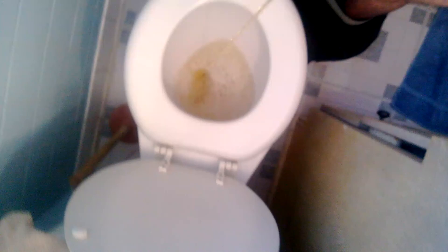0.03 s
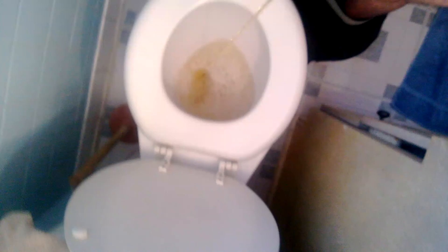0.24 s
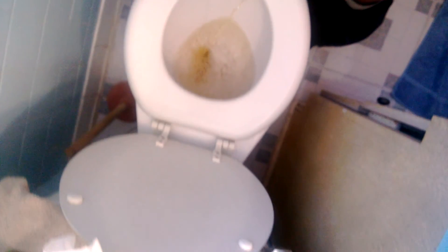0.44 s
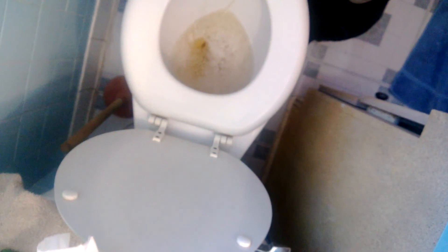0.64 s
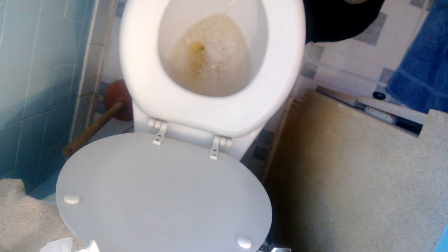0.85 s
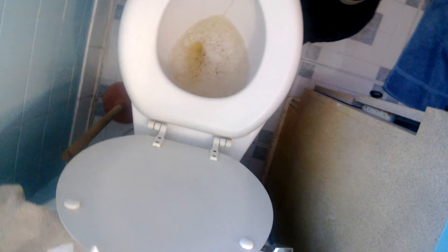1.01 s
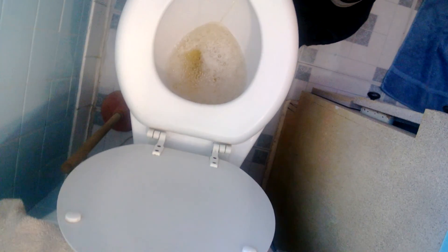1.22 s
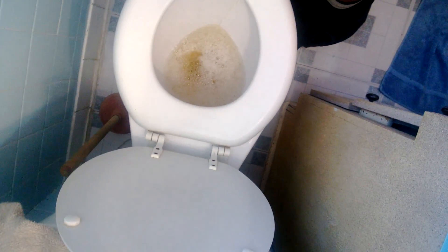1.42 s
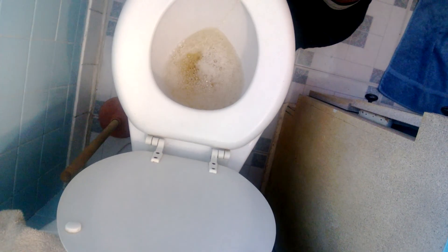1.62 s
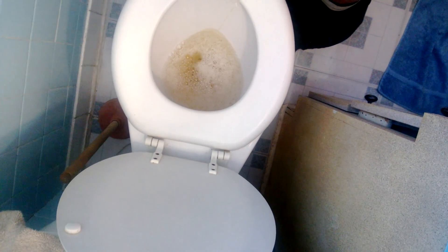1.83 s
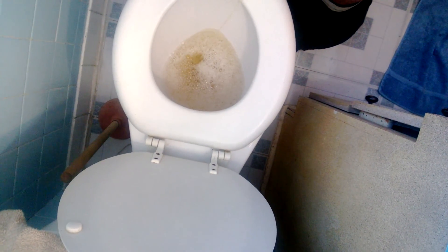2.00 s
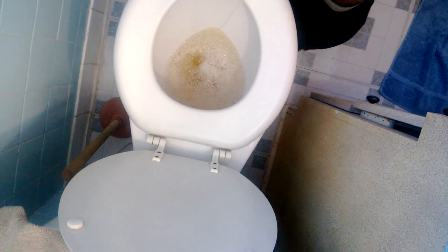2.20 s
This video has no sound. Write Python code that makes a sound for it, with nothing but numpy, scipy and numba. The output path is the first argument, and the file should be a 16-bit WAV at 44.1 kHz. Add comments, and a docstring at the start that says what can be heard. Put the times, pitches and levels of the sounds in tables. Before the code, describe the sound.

Someone pees into a toilet bowl, heard from nearby in a small bathroom. The stream bubbles and gurgles strongly at first, then weakens and breaks into separate splats and drips, with tiny bubbles ticking throughout.

```python
"""A stream of urine falls into the water of a toilet bowl in a small tiled bathroom. While strong, it drives
big gurgling bubbles under the surface; then it thins and breaks into splats. Sharp ticks ring out and tiny
bubbles fizz throughout. Each bubble is a damped sine rising in pitch. The water sounds ring in the bowl and
briefly in the room, over a faint hum."""
import sys
import numpy as np
from scipy import signal
from scipy.fft import rfft, irfft
from scipy.io import wavfile
from scipy.ndimage import uniform_filter1d
from numba import njit

SR = 44100
rng = np.random.default_rng(int(sys.argv[2]) if len(sys.argv) > 2 else 0)


def materialize(psi):
    """Save the field psi as 16-bit PCM at rate SR to the path in sys.argv[1].

    A 1-D psi becomes a single channel; in a 2-D psi each row is a channel.
    """
    bounded = np.clip(np.atleast_2d(psi).T, -1, 1)
    quanta = np.round(bounded * 32767).astype(np.int16)
    wavfile.write(sys.argv[1], SR, quanta)


N = 103635

# deep gurgle (time [s], relative level [dB])
GURGLE_LEVEL = [(0.1, -43.5), (0.12, -46.5), (0.22, -45.5), (0.26, -35), (0.31, -41.5), (0.42, -38.5),
                (0.44, -44), (0.57, -41), (0.65, -39.5), (0.74, -39), (0.76, -38.5), (0.92, -52.5),
                (0.96, -40), (1.0, -52), (1.03, -42), (1.22, -45.5), (1.25, -51), (1.83, -75), (1.85, -55),
                (2.02, -52), (2.11, -74), (2.26, -49.5), (2.32, -53), (2.35, -54)]
# big bubbles, shrinking as the stream weakens (time [s], pitch [Hz])
GURGLE_HZ = [(.1, 363.5), (.65, 397), (1.2, 448.4), (1.45, 580), (1.9, 604), (2.3, 478)]
# single big bubbles (time [s], pitch [Hz], relative level [dB])
GULP_EVENTS = [(.093, 351.5, -34.5), (0.117, 351, -33), (.17, 377, -34.5), (.247, 355, -32),
               (.405, 392, -33), (.503, 398, -36), (.583, 704, -36), (.612, 407, -28.5),
               (0.6503, 383, -23.5), (.703, 690, -37.5), (1.03, 650, -38), (1.066, 650, -36.5),
               (1.076, 446, -38), (1.125, 676, -33.5), (1.16, 706, -34.5), (1.207, 499, -37),
               (1.322, 512, -45.5), (1.347, 720, -38), (1.415, 730, -34.5), (1.563, 662, -45.5),
               (1.594, 685, -41.5), (1.856, 670, -35.5), (1.925, 720, -39.5), (2.285, 479, -36.5)]
# splashing (time [s], relative level [dB])
SPLASH_LEVEL = [(.1, -53.5), (.22, -49), (.34, -44.5), (.39, -42), (.5, -49.5), (.62, -51), (.7, -43),
                (.74, -46.5), (.82, -46), (.93, -50.5), (1.03, -46), (1.2, -52), (1.34, -49), (1.43, -56),
                (1.48, -51.5), (1.52, -56), (1.58, -54.5), (1.65, -59), (1.76, -60.5), (1.84, -55),
                (1.93, -58.5), (2.01, -54), (2.05, -57.5), (2.15, -59), (2.21, -53), (2.27, -55.5),
                (2.35, -73)]
# splash colour (frequency [Hz], gain [dB])
SPLASH_EQ = [(250, -22), (500, -22), (720, 2.5), (950, -9.5), (1250, -1.5), (2000, -2.5), (2800, 2.5),
             (4500, -22), (12000, -24)]
# fine spray, faltering once the stream thins (time [s], relative level [dB])
SPRAY_LEVEL = [(.1, -53), (.15, -54.5), (.26, -50.5), (.36, -48.5), (.5, -50.5), (.59, -53.5), (.7, -46.5),
               (.745, -56), (.8, -47), (.9, -54.5), (.98, -56), (1.07, -54), (1.095, -66), (1.125, -52.5),
               (1.2, -63.5), (1.225, -80), (1.28, -55.5), (1.36, -56), (1.41, -66.5), (1.46, -75.5),
               (1.5, -65), (1.57, -60), (1.67, -62.5), (1.76, -64), (1.88, -55.5), (1.935, -63), (2.0, -62),
               (2.035, -61), (2.09, -50.5), (2.16, -65.5), (2.22, -56.5), (2.28, -70), (2.325, -52.5),
               (2.35, -70)]
# spray colour (frequency [Hz], gain [dB])
SPRAY_EQ = [(1500, -9), (2200, -12), (3200, -5), (4200, -4), (5500, -1.5), (6500, 4), (7500, -2),
            (10500, -1.5), (13000, -6.5), (15500, -8)]
# low room noise (frequency [Hz], gain [dB])
RUMBLE_EQ = [(20, 3), (45, -7), (75, -1), (105, -7.5), (150, -5.5), (250, -12), (1000, -20), (15000, -44)]
# droplets spattering the bowl (time [s], relative level [dB], centre [Hz], decay [s])
SPURT_EVENTS = [(.25, -49, 10200, .012), (.283, -39.5, 9500, .008), (.441, -34, 5460, .004),
                (.614, -40.5, 5140, .006), (0.685, -37, 8700, 0.0064), (.701, -42.5, 10100, 0.02),
                (0.781, -33, 6760, 0.0033), (1.126, -47, 8600, 0.013), (1.177, -44, 7600, 0.013),
                (1.256, -46, 6100, 0.0039), (1.271, -44.5, 9600, .006), (1.324, -52.5, 11100, .02),
                (1.489, -49, 7100, 0.0055), (1.621, -53, 10200, 0.012), (1.655, -47.5, 7700, 0.0096),
                (1.741, -49.5, 6100, .006), (1.781, -44, 7400, 0.0038), (1.795, -52, 9000, 0.0097),
                (1.82, -45.5, 8200, 0.011), (1.855, -41.5, 7100, 0.005), (1.963, -44, 6900, .003),
                (1.981, -39, 7100, 0.0033), (1.99, -48.5, 6460, 0.0096), (2.057, -48.5, 7400, 0.013),
                (2.088, -44.5, 6200, .008), (2.176, -52, 8700, 0.0092), (2.326, -47, 9400, .009)]
# sharp ticks of drops (time [s], relative level [dB], pitch [Hz])
TICK_EVENTS = [(0.264, -48, 6400), (0.2842, -24.5, 6480), (0.3293, -30, 6300), (0.3708, -27, 6300),
               (0.4416, -31.5, 4900), (0.615, -31.5, 5200), (0.6315, -29.5, 6260), (0.6853, -41, 6400),
               (0.759, -33.5, 6300), (0.782, -21, 3110), (.89, -35, 6400), (0.9955, -25.5, 6340),
               (1.271, -27, 10000), (1.8214, -33.5, 4420), (1.822, -36.5, 1950), (1.8563, -33, 2840),
               (1.9894, -33.5, 3520), (2.3035, -36.5, 3340)]
# slugs of liquid slapping the water (time [s], relative level [dB], centre [Hz])
SPLAT_EVENTS = [(0.366, -33.5, 2160), (.408, -40, 1420), (.68, -36, 1690), (0.782, -33, 1800),
                (.783, -48, 3430), (1.004, -35, 1296), (1.126, -40, 1290), (1.21, -38, 1270),
                (1.256, -40.5, 1670), (1.386, -38.5, 1530), (1.398, -47, 3430), (1.412, -35, 1190),
                (1.427, -42, 1266), (1.546, -41, 1620), (1.632, -43.5, 1273), (1.667, -47.5, 1590),
                (1.723, -40.5, 1140), (1.723, -46, 3030), (1.781, -45, 1095), (1.821, -35.5, 3650),
                (1.855, -40.5, 1590), (1.995, -42, 1174), (2.059, -33, 1820), (2.088, -38.5, 1710),
                (2.134, -41.5, 1860), (2.17, -38, 1293), (2.174, -40, 2080)]
# bowl and wall resonances (frequency [Hz], T60 [s], gain over direct sound [dB])
BOWL_WALL_MODES = [(293.4, 1, 10.5), (322.4, 0.35, 12.5), (387, 0.14, 2.5), (447.1, 0.27, 6.5),
                   (567, 0.029, -0.5), (684.5, 0.2, 1.5), (763, 0.29, 0.5), (1167, 0.41, 7.5),
                   (1243.4, 0.11, 18.5), (1537, 0.31, 8), (1632, 0.07, 11), (1721, 0.16, 9),
                   (1950, 0.24, 5), (2570, 0.34, -3.5), (4380, 0.16, -0.5), (5075, 0.081, 8.5),
                   (5266, 0.038, 3.5), (6590, 0.028, -2)]
# dense reflections (low edge [Hz], high edge [Hz], T60 [s], gain [dB])
REFLECTIONS = [(2780, 11400, 0.023, -8.5),  # porcelain
               (565, 2560, 0.17, -2),  # room, mids
               (4000, SR / 2, 0.12, -4)]  # room, treble

TIME_S = np.arange(N) / SR
THINNING_S = (1.05, 1.41)


def undb(db):
    return 10 ** (np.asarray(db) / 20)


def unit_rms(x):
    return x / np.sqrt(np.mean(x ** 2) + 1e-18)


def envelope(rows):
    return undb(np.interp(TIME_S, *np.array(rows).T))


def thinned(time_s):
    """0 = full stream, 1 = thin."""
    return np.interp(time_s, THINNING_S, [0, 1])


def bandpass(x, lo_hz, hi_hz):
    sos = signal.butter(2, [lo_hz, min(hi_hz, SR / 2 - 1)], "band", fs=SR, output="sos")
    return signal.sosfilt(sos, x)


def highpass(x, cut_hz):
    return signal.sosfilt(signal.butter(4, cut_hz, "high", fs=SR, output="sos"), x)


def colour(x, eq, size=2048):
    """Minimum-phase EQ; output rms 1."""
    hz, db = np.array(eq).T
    bins_hz = np.arange(size // 2 + 1) * SR / size
    gain = undb(np.interp(np.log(bins_hz + 1), np.log(hz), db))
    cepstrum = irfft(np.log(gain))[:size // 2]
    cepstrum[1:] *= 2
    impulse = irfft(np.exp(rfft(cepstrum, size)))
    return unit_rms(signal.fftconvolve(x, impulse)[:N])


@njit
def bubbles(start_s, hz, cycles, gain, glide, swell_cycles):
    """Sines that swell, rise by the fraction `glide` and decay 60 dB over `cycles`."""
    out = np.zeros(N)
    for k in range(len(start_s)):
        first, length, phase = int(start_s[k] * SR), cycles[k] * SR / hz[k], 0.
        for i in range(max(0, min(int(length), N - first))):
            age = i / length
            phase += min(hz[k] * (1 + glide * age) / SR, .45)
            level = gain[k] * np.exp(-6.9 * age) * (1 - np.exp(-phase / swell_cycles))
            out[first + i] += level * np.sin(2 * np.pi * phase)
    return out


def swarm(per_s, lo_hz, hi_hz, cycles, scatter_db, slots, thin_share=.55):
    """Random small bubbles, fewer once the stream thins; rms 1."""
    jitter, pitch, length, chance, strength = rng.random((slots, 5)).T
    slot_s = N / SR / slots
    start_s = (np.arange(slots) + jitter) * slot_s
    thin = thinned(start_s)
    share = 1 + (thin_share - 1) * thin
    present = chance < share * per_s * slot_s
    hz = lo_hz * (hi_hz / lo_hz) ** pitch
    dull_db = -5.5 * thin * (hz > 10100)  # thin stream loses its finest fizz
    gain = undb(dull_db - scatter_db * np.log(strength + 0.028)) * present * np.sqrt(hz / share)
    return unit_rms(bubbles(start_s, hz, cycles * (.5 + length), gain, glide=0.057, swell_cycles=1.6))


def cluster(start_s, db, centre_hz, decay_s, log_spread, count):
    """Fading burst of bubbles around one pitch."""
    pitch, strength = rng.standard_normal((count, 2)).T
    delay_s = 3 * decay_s * (np.arange(count) + rng.random(count)) / count
    hz = centre_hz * np.exp(log_spread * pitch)
    gain = np.exp(-delay_s / decay_s) * undb(2 * strength)
    burst = bubbles(start_s + delay_s, hz, np.full(count, 17.), gain, glide=0.34, swell_cycles=1.6)
    return burst * undb(db) * np.sqrt(decay_s * SR / 2 / np.sum(burst ** 2))


def gurgle(count=230, cycles=20., gain_db=-5):
    """The jet drives big overlapping bubbles under water."""
    jitter, pitch, strength = rng.standard_normal((count, 3)).T
    start_s = np.abs(np.arange(count) + 0.3105 * jitter) * N / SR / count
    log_spread = 0.051 + 0.152 * thinned(start_s)
    hz = np.interp(start_s, *np.array(GURGLE_HZ).T) * np.exp(log_spread * pitch)
    deep = bubbles(start_s, hz, np.full(count, cycles), undb(2 * strength), glide=0.29, swell_cycles=0.36)
    return unit_rms(bandpass(deep, 256, 705)) * envelope(GURGLE_LEVEL) * undb(gain_db)


def gulps(cycles=16., gain_db=9.54):
    """The largest bubbles stand out as single rising blups."""
    start_s, hz, db = np.array(GULP_EVENTS, float).T.copy()
    gain = undb(db + gain_db)
    blups = bubbles(start_s, hz, np.full(len(hz), cycles), gain, glide=0.33, swell_cycles=3.0)
    return bandpass(blups, 280, 900)


def heave(level_db=-65.5, thin_db=-15.5):
    """Low churning of the water under the strong stream."""
    churn = unit_rms(bandpass(rng.standard_normal(N), 69.4, 124.2))
    return churn * undb(level_db + thin_db * thinned(TIME_S))


def splash(gain_db=-6):
    """Short-lived mid-size bubbles where the stream breaks the surface."""
    grains = swarm(per_s=1100, lo_hz=576, hi_hz=3763, cycles=12.7, scatter_db=3.5, slots=3000)
    return highpass(colour(grains, SPLASH_EQ) * envelope(SPLASH_LEVEL), 370) * undb(gain_db)


def spray(clump_s=.004, clump_db=4, gain_db=-0.5):
    """Fine fizz, one clump per droplet, plus sparser pips of tiny bubbles."""
    fizz = swarm(per_s=4500, lo_hz=2085, hi_hz=14180, cycles=21, scatter_db=3.6, slots=13000)
    hold = int(clump_s * SR)
    clumps = np.repeat(rng.standard_normal(N // hold + 1), hold)[:N]
    fizz = unit_rms(fizz * uniform_filter1d(undb(clump_db * clumps), size=40))
    pips = swarm(per_s=300, lo_hz=2860, hi_hz=11900, cycles=34, scatter_db=4.4, slots=800)
    grains = fizz + pips * undb(-3.5 - 5 * thinned(TIME_S))
    return highpass(colour(grains, SPRAY_EQ) * envelope(SPRAY_LEVEL), 1450) * undb(gain_db)


def background(hum_hz=102.4, hum_db=-72, rumble_db=-68.5):
    """Faint hum and low room noise."""
    hum = np.sqrt(2) * np.sin(2 * np.pi * hum_hz * TIME_S)
    rumble = colour(rng.standard_normal(N), RUMBLE_EQ)
    return undb(hum_db) * hum + undb(rumble_db) * rumble


def spurts(gain_db=-2.5):
    """Each spurt of droplets scatters into a dense burst of tiny bubbles."""
    bursts = sum(cluster(start_s, db + gain_db, hz, decay_s, log_spread=0.25, count=110)
                 for start_s, db, hz, decay_s in SPURT_EVENTS)
    return bandpass(bursts, 1700, 12800)


def ticks(ring_cycles=24.4, crack_hz=6260, crack_cycles=22, gain_db=-2.5):
    """A drop ticks sharply on the surface: a short tone at its own pitch plus a common high ring near 6.3 kHz."""
    start_s, db, hz = np.array(TICK_EVENTS, float).T.copy()
    start_s += 0.00028
    gain, each = undb(db + gain_db), np.ones(len(hz))
    ring = bubbles(start_s, hz, ring_cycles * each, 1.57 * gain, glide=0.013, swell_cycles=1.1)
    crack = bubbles(start_s, crack_hz * each, crack_cycles * each, gain, glide=0.073, swell_cycles=1.6)
    return highpass(bandpass(ring + crack, 1000, 12000), 570)


def splats(gain_db=-5.5):
    """Each slug of liquid drives a cluster of mid-size bubbles into the water."""
    slaps = sum(cluster(start_s, db + gain_db, hz, decay_s=.01, log_spread=.27, count=36)
                for start_s, db, hz in SPLAT_EVENTS)
    return highpass(slaps, 1120)


def bathroom(direct, build_s=0.00079):
    """Direct sound plus resonances and dense reflections of bowl and tiles."""
    t = np.arange(SR // 2) / SR
    impulse = np.zeros(len(t))
    for hz, t60_s, db in BOWL_WALL_MODES:
        gain = undb(db) * 2 * np.log(1000) / (t60_s * SR)
        impulse += gain * undb(-60 * t / t60_s) * np.sin(2 * np.pi * hz * t)
    for lo_hz, hi_hz, t60_s, db in REFLECTIONS:
        tail = rng.standard_normal(len(t)) * undb(-60 * t / t60_s) * (1 - np.exp(-t / build_s))
        impulse += undb(db) * bandpass(tail / np.linalg.norm(tail), lo_hz, hi_hz)
    return direct + signal.fftconvolve(direct, impulse)[:N]


def scene():
    """Water sounds in the bathroom, over the background; mono."""
    water = heave() + gurgle() + gulps() + splash() + spray() + splats() + spurts() + ticks()
    return (bathroom(water) + background())[None]


def record(dry):
    """Abrupt cut-in, steep low-pass."""
    start_s, fade_s, top_hz = 0.0906, 0.0053, 15800
    gate = np.clip((TIME_S - start_s) / fade_s, 0, 1)
    return signal.sosfilt(signal.ellip(10, .2, 70, top_hz, fs=SR, output="sos"), dry * gate)


dry = scene()
out = record(dry)
materialize(out)
```